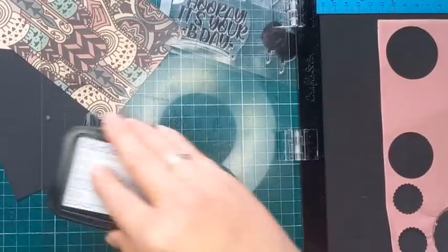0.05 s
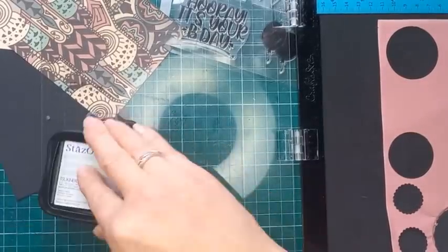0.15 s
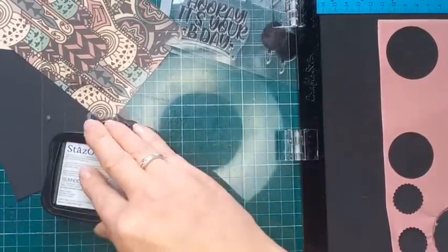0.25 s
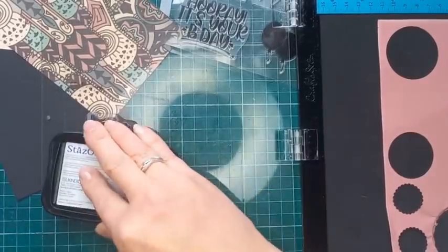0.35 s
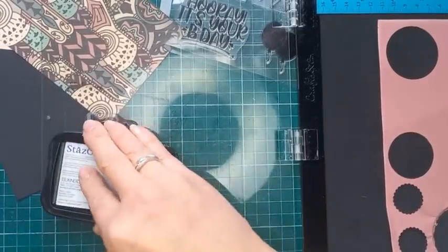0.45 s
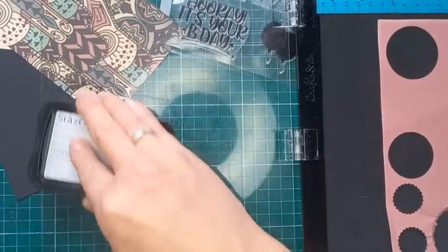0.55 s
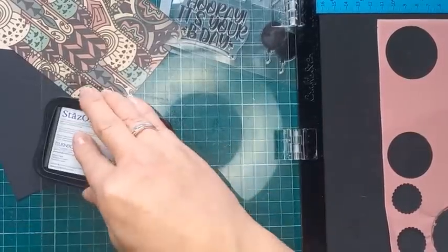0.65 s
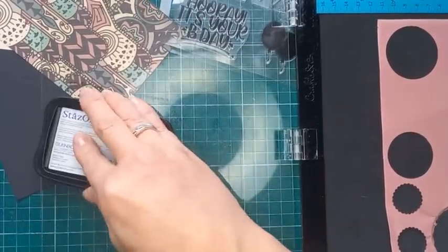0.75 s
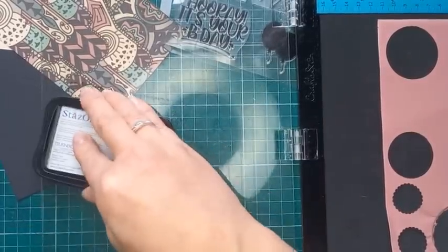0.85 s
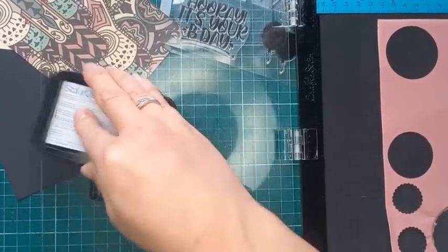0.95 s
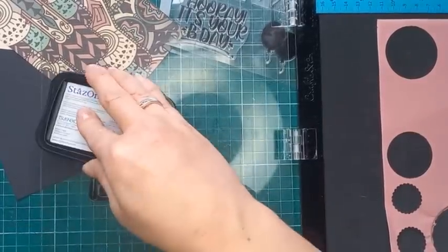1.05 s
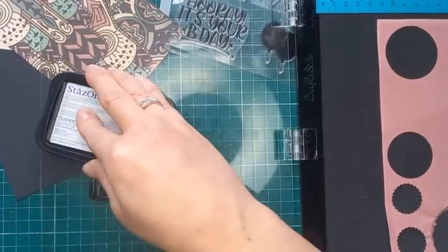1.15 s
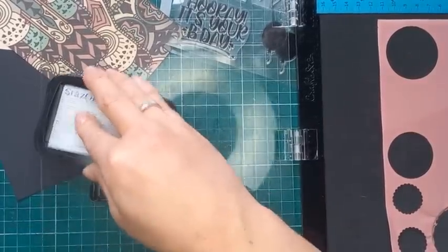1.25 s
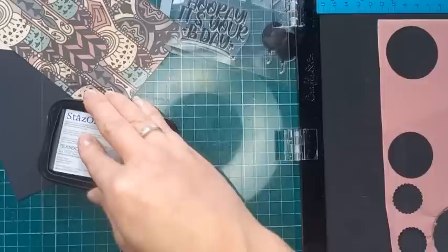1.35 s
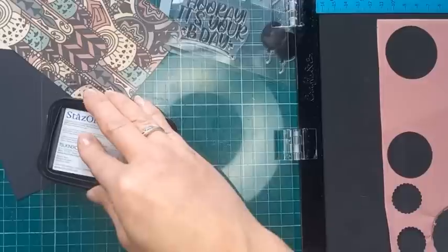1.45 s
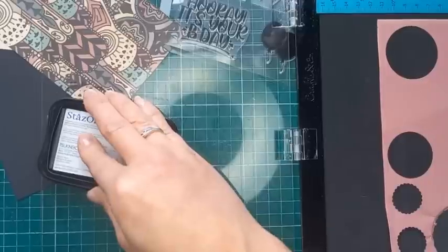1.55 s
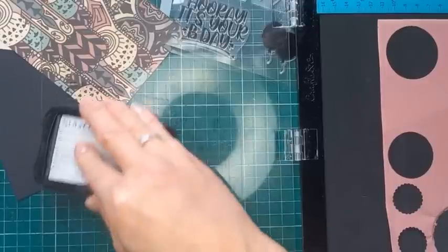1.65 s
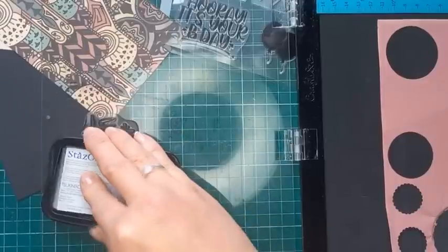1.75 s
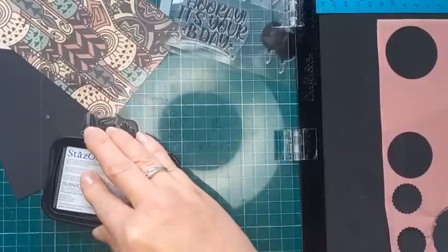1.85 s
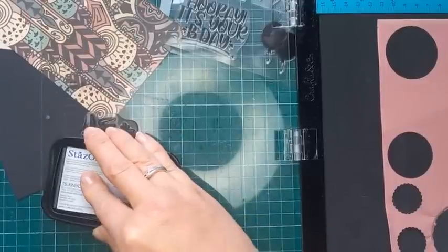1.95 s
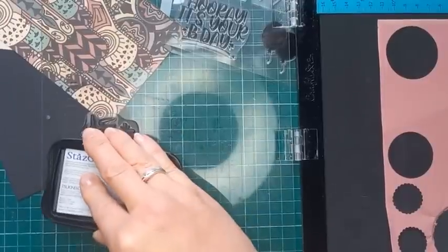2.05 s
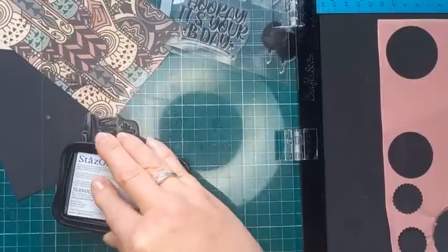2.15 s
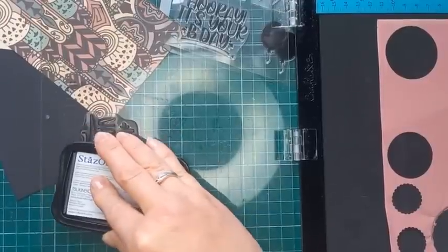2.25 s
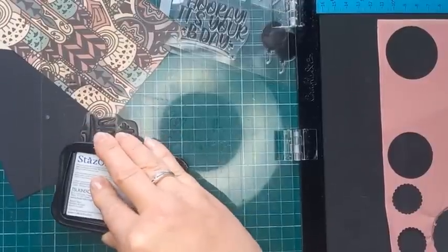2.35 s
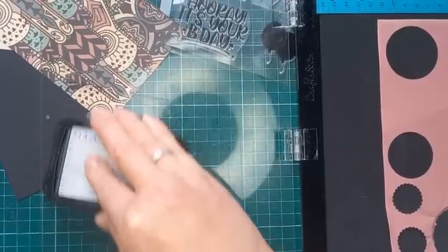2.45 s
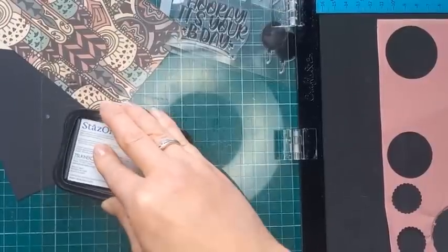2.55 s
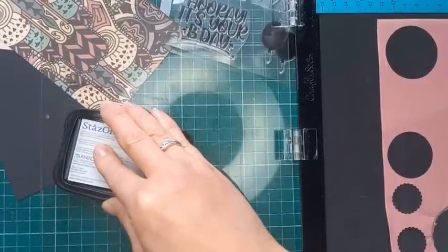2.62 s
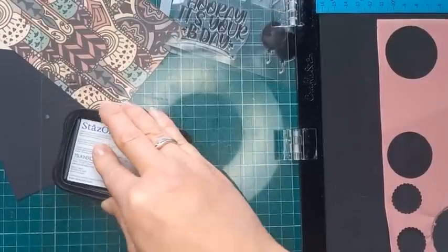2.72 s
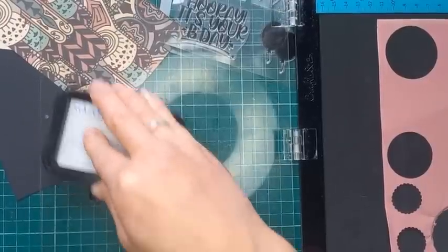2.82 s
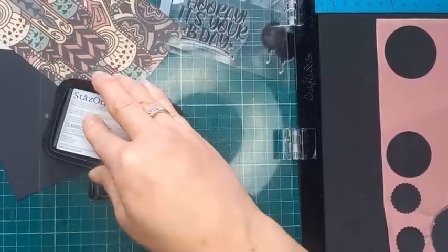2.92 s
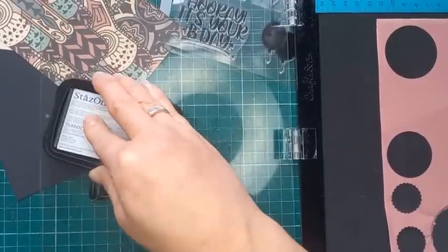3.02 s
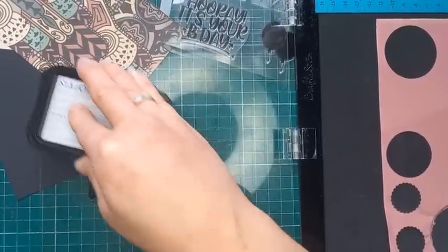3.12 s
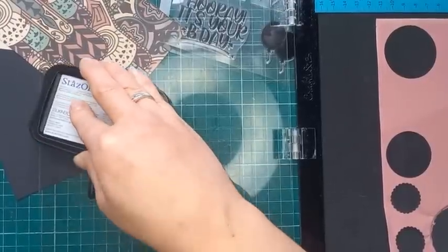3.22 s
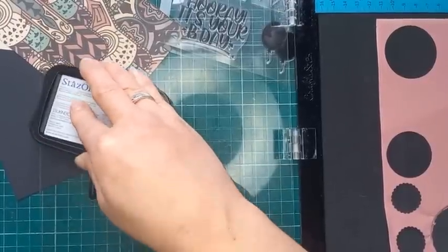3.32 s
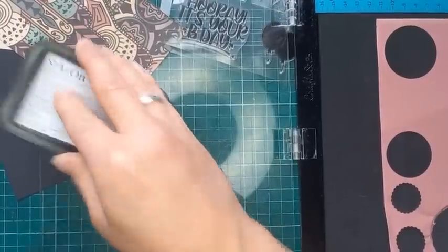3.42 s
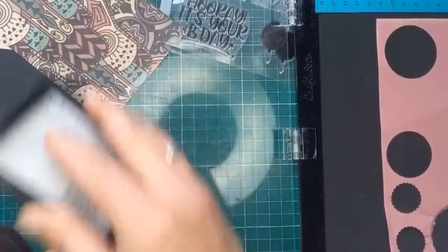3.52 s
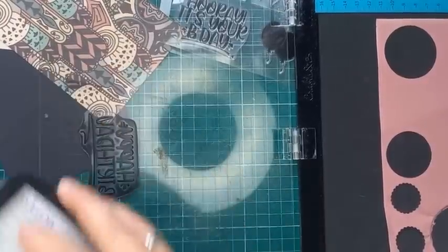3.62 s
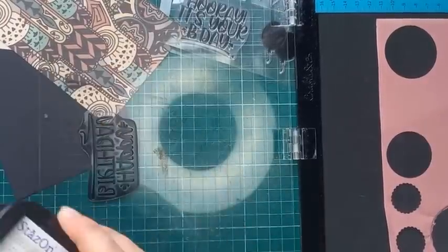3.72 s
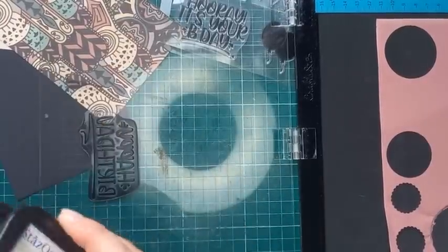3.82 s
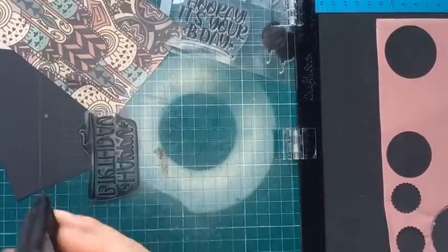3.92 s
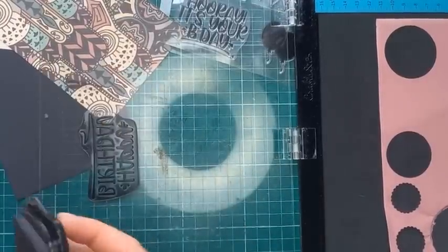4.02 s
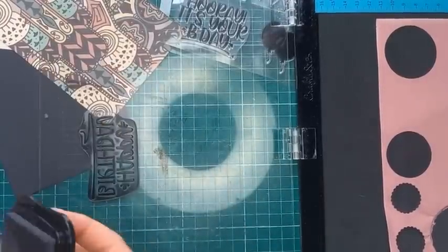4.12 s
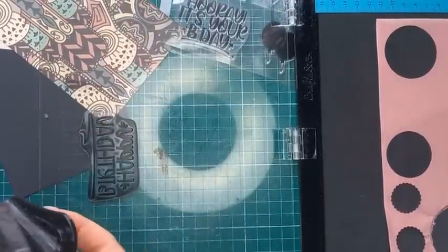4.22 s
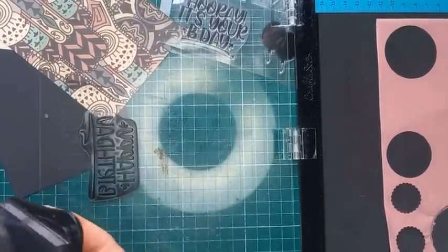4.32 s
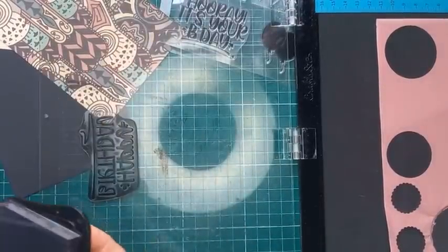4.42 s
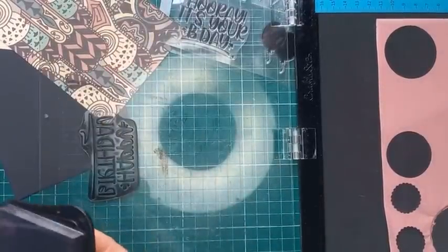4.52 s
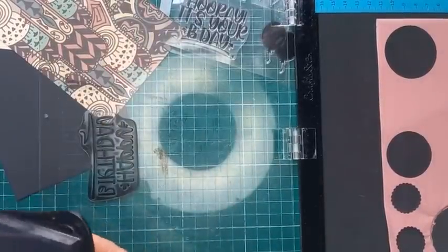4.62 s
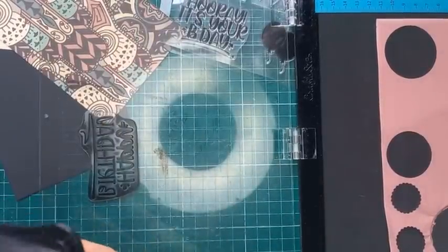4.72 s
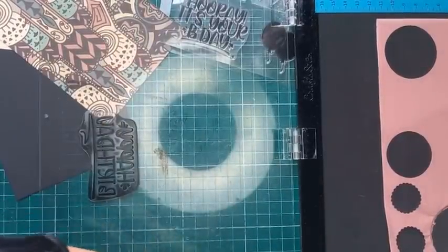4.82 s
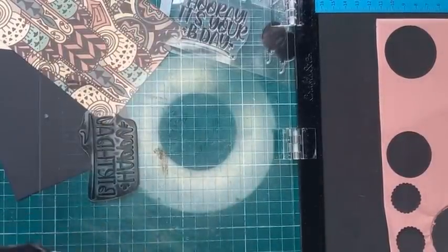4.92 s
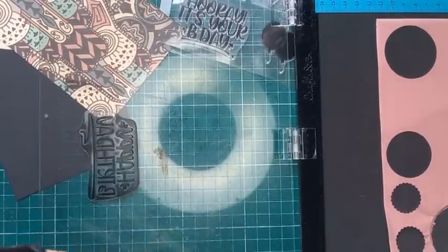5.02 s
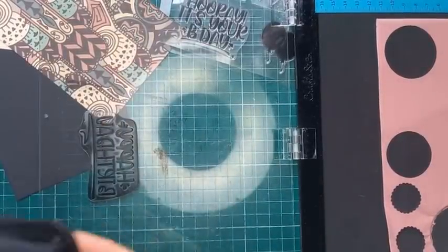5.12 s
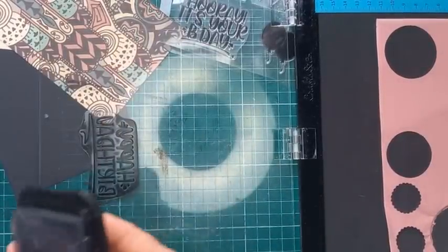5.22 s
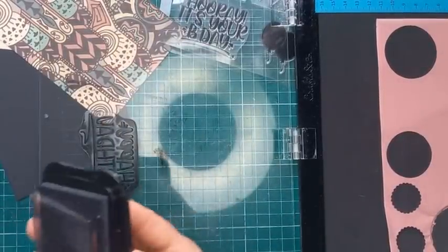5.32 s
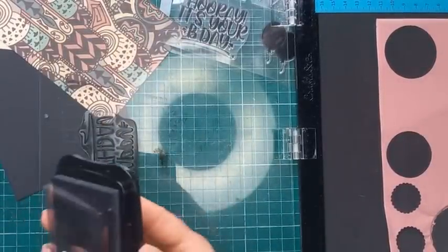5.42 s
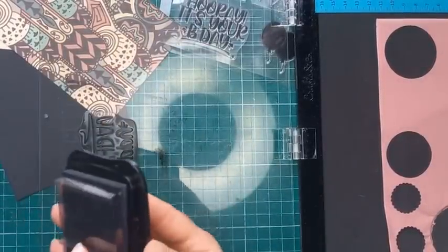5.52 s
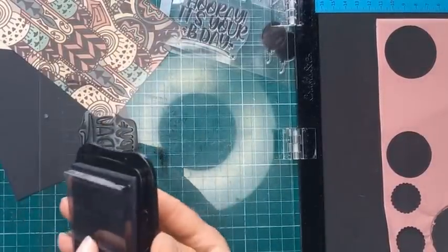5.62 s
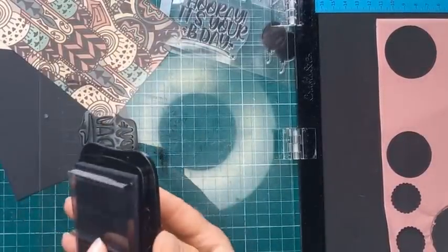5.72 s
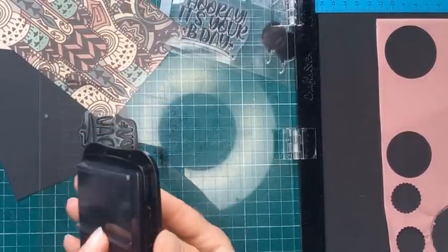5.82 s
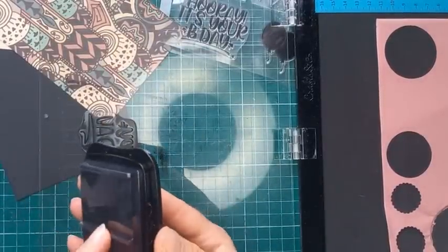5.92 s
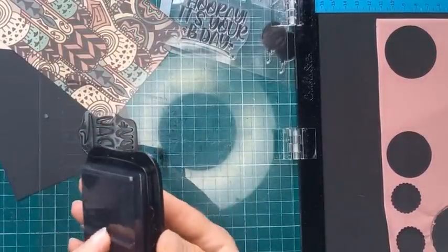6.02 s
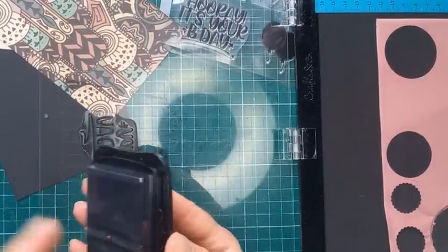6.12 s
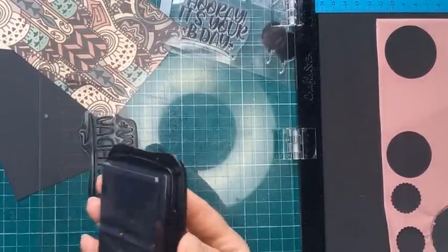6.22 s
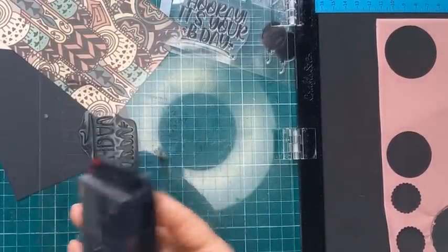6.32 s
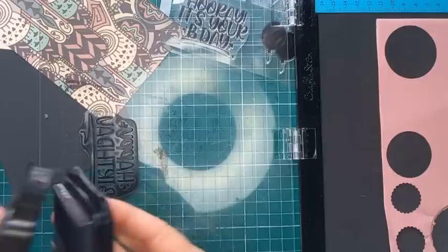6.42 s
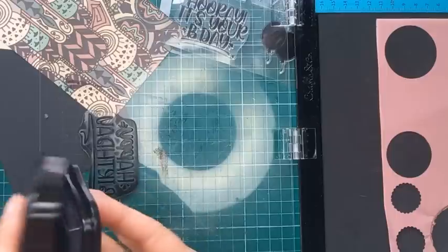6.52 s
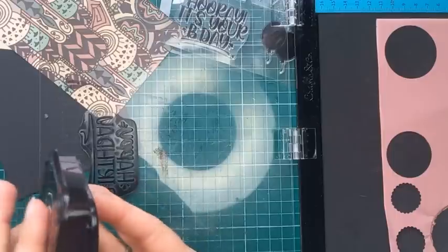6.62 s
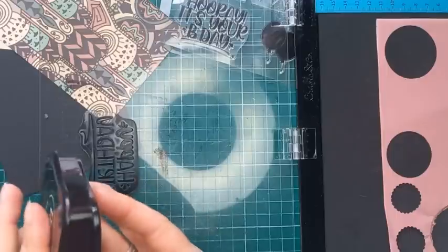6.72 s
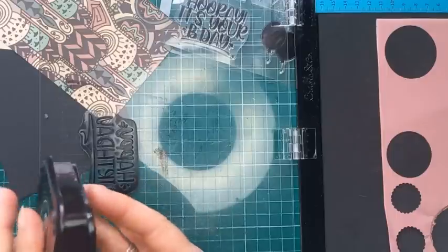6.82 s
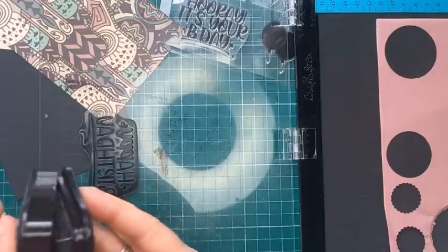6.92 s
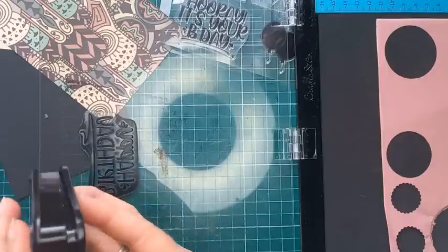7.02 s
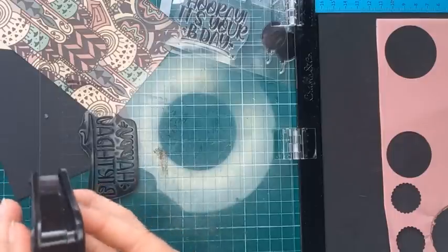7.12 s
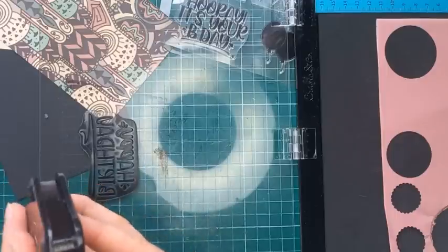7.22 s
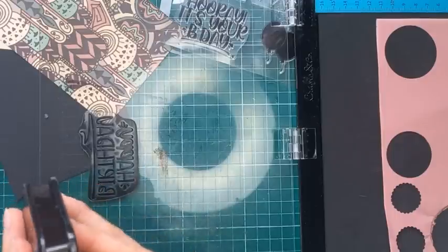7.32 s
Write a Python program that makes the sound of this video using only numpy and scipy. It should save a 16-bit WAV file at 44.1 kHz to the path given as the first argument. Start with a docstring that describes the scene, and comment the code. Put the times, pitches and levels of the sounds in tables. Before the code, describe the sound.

Close stereo pickup in a small room with short reflections and a faint low rumble and hiss. Fingers rub and tick on plastic at the very start. From 0.24 s to 3.2 s an ink pad is dabbed nine times on a rubber stamp, roughly every 0.4 s: first lightly, then more firmly, the sixth near 2.2 s with the hardest edge landing. Each dab is a tight, dry double clack with a soft low thump; between dabs the ink peels and pops quietly, the last pop at 3.4 s. A lull follows, with small lid clicks at 4.1-4.3 s, faint squeaks and soft hand shifts. Brushing and a click at 5.3 s lead to a sharp knock at 5.56 s. After near quiet, the lid clatters at 6.6-6.7 s, snaps in rapid clicks at 6.9-7.05 s, and the case bumps the table at 7.16 and, harder, at 7.25 s.

```python
"""Ink pad dabbed on a rubber stamp

A plastic ink pad is dabbed nine times on a rubber stamp on a craft table, close to the microphone in a small room.
In each dab the rim grazes the stamp, one edge lands, the pad rocks flat and the table thumps; the tacky ink then
peels and pops loose. Afterwards the lid is picked up, fitted and snapped on, and the case is bumped on the table.
Contacts are sums of decaying modes with noise cracks; rubbing and peeling are swelling stick-slip noise."""
import sys
import numpy as np
from scipy import signal
from scipy.fft import rfft, irfft
from scipy.io import wavfile

SR = 44100
rng = np.random.default_rng(int(sys.argv[2]) if len(sys.argv) > 2 else 0)


def file_out(sig):
    """Save sig as 16-bit WAV at sys.argv[1]."""
    # one column per channel
    cols = np.atleast_2d(sig).T
    # limit, then scale
    lim = np.clip(cols, -1, 1)
    pcm = np.round(lim * 32767).astype(np.int16)
    wavfile.write(sys.argv[1], SR, pcm)


N = 324576
TIME = np.arange(N) / SR
AGE = np.arange(SR // 8) / SR   # time since a contact, s

# Lid and case knocking together: start_s, level_db, lows_db, highs_db, wall_ring_hz, wall_ring_db
LID_CLICKS = [(4.1264, -41, -21, 9, 3460, 11), (4.2335, -31, 2.5, -2.5, 1510, -9),
              (4.315, -26, -8.5, -2, 2100, -4.5), (5.3111, -26.5, -9, 9.5, 1000, -6.5),
              (5.5575, -12.5, -11, -4.5, 4714, -5), (6.5947, -16, -28, 4, 1660, 1.5),
              (6.6473, -21, -31, 6, 1880, 2), (6.6845, -12, -39, -3.5, 1615, 1.5),
              (6.8974, -23, -6, -21, 1897, 0.5), (6.9131, -23.5, -7, -1.5, 1685, 9),
              (6.921, -28, -1, 13.5, 3660, -12), (6.9358, -21.5, -11.5, -4, 1740, -2),
              (7.008, -30, -14, 4, 3250, 9), (7.0339, -14.5, -13, -36, 1600, -13),
              (7.0442, -12, 0, -9, 1524, 5.5), (7.157, -12.5, -0.5, -8.5, 2170, -5),
              (7.2525, -17.5, 4.5, 6.5, 1760, 0)]
# Pad landing on the stamp: start_s, edge_landing_db, rock_flat_s, face_landing_db, table_push_db,
# edge_sharpness_db, left_minus_right_db, face_ring_hz
PAD_DABS = [(0.2395, -30.5, .0066, -20.5, -31.5, -9.5, -1, 3040),
            (0.6533, -22.5, 0.011, -20.5, -22, -9, 0.5, 1660),
            (1.0272, -14, .007, -16.5, -18.5, -6, 2.5, 1586),
            (1.4018, -21, .0088, -16, -20.5, -4.5, 0.5, 1700),
            (1.807, -14.5, 0.0035, -17, -18.5, -4.5, -0.5, 3190),
            (2.1905, -4, 0.0049, -19, -28, -16.5, 0, 1890),
            (2.551, -17.5, .0047, -10.5, -24, -13.5, -2, 1830),
            (2.9182, -14.5, 0.0033, -12, -16.5, -17.5, -0.5, 3020),
            (3.2103, -15.5, .0048, -10, -17, -19.5, 0.5, 2260)]
# Pad lifting off: pop_s, pop_db, hardest_pull_to_pop_s, peeling_db, table_rebound_db
PAD_LIFTS = [(0.4957, -38.5, -0.032, -53, -43.5), (0.9491, -26, 0.014, -51, -62),
             (1.3164, -19, 0.0042, -42, -48), (1.722, -27, 0.034, -53, -53),
             (2.1146, -30, 0.026, -58.5, -57), (2.4581, -27, 0.017, -51, -54),
             (2.8413, -24.5, .012, -54, -36.5), (3.1701, -40, 0.036, -55.5, -37),
             (3.4355, -21.5, 0.0042, -53.5, -46)]
# Modes of the pad: pitch_hz, level_db, t60_s
PAD_MODES = [(292, 5.5, 0.011), (703, -6.5, 0.028), (884, 10.5, 0.021), (1230, -19.5, .02),
             (1654.5, -6, 0.013), (2060, -4.5, .02), (2364, 3.5, 0.023), (3084, -6, 0.024),
             (3730, -1, 0.03), (5100, -4, 0.013)]
# Modes of the lid: pitch_hz, level_db, t60_s
LID_MODES = [(322, -27.5, 0.039), (698.5, 7, 0.026), (727, 7.5, 0.037), (985, 4, .03), (1472, 3.5, 0.013),
             (1926, 4, 0.029), (2230, -2, 0.02), (3200, -4, 0.014), (3465, 4, 0.017), (4470, -5, 0.011),
             (5900, -12.5, 0.052)]


def from_db(db):
    """Amplitude gain from decibels: 20 dB is a factor of ten."""
    return 10 ** (np.asarray(db) / 20)


def rms_one(x):
    """Normalise the mean power to one, so that gains alone set levels."""
    return x / np.sqrt(np.mean(x ** 2) + 1e-20)


def unit_hit(x):
    """Normalise a transient by energy: that of 4 ms at unit rms."""
    return rms_one(x) * np.sqrt(.004 * SR / x.shape[-1])


def fade(t, t60):
    """Exponential decay of a damped resonance, 60 dB in t60 seconds."""
    return np.exp(-np.log(1000) * t / t60)


def swell(s, half):
    """A Gaussian rise and fall of effort around time s, down to 1/e at s +/- half."""
    return np.exp(-((TIME - s) / half) ** 2)


def at_hz(points, hz):
    """Interpolate a table linearly along a logarithmic frequency axis."""
    f, value = np.transpose(points)
    return np.interp(np.log(np.maximum(hz, 1)), np.log(f), value)


def cut(x, hz, kind, order=2):
    """Butterworth filtering: a maximally flat passband."""
    sos = signal.butter(order, np.clip(hz, 10, .45 * SR), kind, fs=SR, output="sos")
    return signal.sosfilt(sos, x)


def colour(x, spectrum, size=4096):
    """Minimum-phase filtering: folding the cepstrum gives a causal response with the given spectrum."""
    hz = np.arange(size // 2 + 1) * SR / size
    cepstrum = irfft(np.log(from_db(at_hz(spectrum, hz))))
    cepstrum[1:size // 2] *= 2
    cepstrum[size // 2 + 1:] = 0
    response = irfft(np.exp(rfft(cepstrum)))
    return signal.fftconvolve(x, response[None], axes=-1)[:, :x.shape[-1]]


def stereo_noise(size, apart):
    """Partly coherent white noise at two ports; apart is the side-to-mid ratio."""
    mid, side = rng.standard_normal((2, size))
    return rms_one(mid + apart * side * [[1], [-1]])


def add(track, s, sound):
    """Linear superposition of a sound from time s."""
    start = round(s * SR)
    track[:, start:start + sound.shape[-1]] += sound[..., :N - start]


def background(wander_db):
    """Stationary hiss over a rumble of slowly modulated power; both swell from a quieter start."""
    # Noise spectrum: frequency_hz, density_db (per Hz)
    floor_spectrum = [(25, -33), (45, -7.5), (62, 3.5), (130, -8), (250, -9.5), (500, -18.5), (1200, -28),
                      (3000, -31), (4000, -34), (5200, -32), (7000, -34.5), (16000, -33.5)]
    rumble_db, hiss_db = -65, -62
    start_dip_db, start_swell_s = -9.5, 1.2
    low_noise = cut(stereo_noise(N, 3), 700, "high", order=1)   # thinned lows, wide between the ports
    noise = rms_one(colour(stereo_noise(N, 0.86) + low_noise, floor_spectrum))
    steps = np.arange(0, N / SR + 1, 1 / 10)
    wander = np.interp(TIME, steps, 2 * rng.random(len(steps)) - 1)
    rumble = from_db(rumble_db + wander_db * wander) * cut(noise, 440, "low", order=1)
    hiss = from_db(hiss_db) * cut(noise, 550, "high", order=1)
    return from_db(start_dip_db * np.exp(-(TIME / start_swell_s) ** 2)) * (rumble + hiss)


def room_response(build_s):
    """Diffuse reverberation: close reflections decay band by band; long waves are alike at both ports."""
    # Decay of the room: frequency_hz, t60_s
    decay_times = [(60, 0.6), (200, 0.27), (500, 0.17), (1100, 0.15), (3000, 0.2), (7000, .185),
                   (16000, 0.13)]
    # Reverberant spectrum: frequency_hz, density_db (per Hz)
    tail_spectrum = [(60, -6.5), (200, 0), (500, 5), (1000, -4), (2000, -2.5), (5000, -1.5), (9000, -4.5),
                     (16000, 1)]
    t, tail = TIME[:SR // 2], 0
    edges = 40 * 2 ** np.arange(10)   # octave bands, Hz
    for low, high in zip(edges, edges[1:]):
        hz = np.sqrt(low * high)
        noise = cut(stereo_noise(len(t), (hz + 200) / (hz + 700)), [low, high], "band")
        band = noise * fade(t, at_hz(decay_times, hz)) * (1 - np.exp(-(t / build_s) ** 2))
        band_gain = np.sqrt(2 * (high - low) / SR / len(t)) * from_db(at_hz(tail_spectrum, hz))
        tail = tail + rms_one(band) * band_gain
    return tail


def room(x, wet_db, build_s, count=4):
    """Position-dependent reflections: as the hands move, equal-power crossfades pass between responses."""
    place, out = 2 * TIME % count, 0   # two places a second, in a cycle
    for k in range(count):
        distance = np.abs((place - k + count / 2) % count - count / 2)
        nearness = np.sqrt(np.maximum(1 - distance, 0))
        out = out + signal.fftconvolve(x * nearness, room_response(build_s), axes=-1)[:, :N]
    return from_db(wet_db) * out


def hand_shifts():
    """Low-frequency friction noise: soft rumbles as the hands lean and shift on the table."""
    # Movements: middle_s, half_length_s, level_db
    movements = [(4.62, 0.18, -68), (5.604, .07, -62), (5.9, 0.093, -62.5), (6.186, 0.015, -72.5),
                 (6.48, 0.13, -53.5)]
    effort = sum(from_db(db) * swell(s, half) for s, half, db in movements)
    return effort * rms_one(cut(stereo_noise(N, 0.58), [54.4, 233.3], "band"))


def squeaks():
    """Stick-slip oscillation: narrow-band noise gives a fingertip's squeak its wavering pitch."""
    # Faint squeaks on the case: middle_s, half_length_s, pitch_hz, level_db
    slips = [(3.735, .05, 2600, -72.5), (4.70, .018, 4600, -61.5), (5.09, 0.029, 3040, -68),
             (6.405, 0.096, 2640, -64.5)]
    band, out = np.array([-60, 60]), 0   # band edges about the pitch, Hz
    for s, half, hz, db in slips:
        tone = rms_one(cut(stereo_noise(N, 0.97), hz + band, "band", order=1))
        out = out + from_db(db) * swell(s, half) * tone
    return out


def peels():
    """Adhesive peeling: the ink sounds in a swell around the hardest pull of each lift."""
    half_s = 0.026
    return [(s - lead, half_s, db) for s, _, lead, db, _ in PAD_LIFTS]


def catches():
    """Friction before slip: the rims scrape briefly just before each click."""
    lead_s, half_s, relative_db = 0.0044, 0.007, -22   # relative to the click's level
    return [(s - lead_s, half_s, db + relative_db) for s, db, *_ in LID_CLICKS]


def rubbing(gain_db, grains_per_s, grain_db, smooth_db, ring_db):
    """Stick-slip friction: tiny grains over a smooth hiss swell with each movement and ring the plastic."""
    # Fingers sliding on the plastic: middle_s, half_length_s, level_db
    strokes = [(0, 0.031, -37.5), (.14, 0.1, -47.5), (3.42, 0.15, -52.5), (4.233, 0.024, -45),
               (4.699, 0.016, -53), (5.216, 0.037, -48.5), (5.333, 0.044, -44.5), (5.501, 0.017, -36.5),
               (5.83, 0.015, -50.5), (6.437, 0.2, -61), (6.95, 0.024, -53), (7.216, 0.024, -55)]
    # Modes of the case under a sliding finger: pitch_hz, level_db, t60_s
    slide_modes = [(1740, 0.5, 0.032), (2071, -2, 0.13), (2450, 0.5, 0.049), (3070, -6, 0.2),
                   (3594, 0, 0.017), (5300, -3, 0.045)]
    # Friction spectrum: frequency_hz, density_db (per Hz)
    rub_spectrum = [(100, -32), (700, -20.5), (1200, -6.5), (1800, -6.5), (3000, 0.5), (5500, -3),
                    (7500, -6), (16000, -16.5)]
    effort = sum(from_db(db) * swell(s, half) for s, half, db in list(strokes) + peels() + catches())
    grain_sizes = from_db(grain_db * np.minimum(rng.exponential(1, N), 4))
    grains = (rng.random(N) < grains_per_s / SR) * grain_sizes
    friction = rms_one(grains * stereo_noise(N, 0.36)) + from_db(smooth_db) * stereo_noise(N, 0.49)
    shell = sum(from_db(db) * np.cos(2 * np.pi * hz * AGE) * fade(AGE, t60) for hz, db, t60 in slide_modes)
    ringing = rms_one(signal.fftconvolve(friction, shell[None], axes=-1)[:, :N])
    return from_db(gain_db) * effort * rms_one(colour(friction + from_db(ring_db) * ringing, rub_spectrum))


def struck(modes, crack_db, crack_t60, apart, rise_s):
    """Modal synthesis: each mode has its own strength at each port, over a crack of dense upper modes."""
    hz, db, t60 = np.transpose(modes)[:, :, None]
    strength = from_db(db + 2 * rng.standard_normal((2, len(modes), 1)))
    # Short waves reach the ports out of step.
    skew = apart * np.sqrt(hz / hz.max()) * rng.standard_normal((2, len(modes), 1))
    side = rng.choice([-1, 1], (len(modes), 1))   # the point struck sets each mode's direction
    rings = (side * strength * np.sin(2 * np.pi * hz * AGE + skew) * fade(AGE, t60)).sum(axis=1)
    crack = cut(stereo_noise(len(AGE), 0.96) * fade(AGE, crack_t60), 8200, "low", order=1)
    return (unit_hit(rings) + from_db(crack_db) * unit_hit(crack)) * (1 - np.exp(-AGE / rise_s))


def small_hits(events, body_of, thin_hz):
    """Impulse excitation differing only in strength, with a high-pass that thins the body's lower modes."""
    out = np.zeros((2, N))
    for s, db in events:
        add(out, s, from_db(db) * unit_hit(cut(body_of(), thin_hz, "high", order=3)))
    return out


def knocks(events, body_of, wall_cycles, low_db, mid_db, high_db, top_db):
    """Hard contact: the grip picks one wall resonance, weight sets the lows and sharpness the highs."""
    out, phase = np.zeros((2, N)), np.array([[.5], [-.5]])
    for s, db, lows, highs, pan, wall_hz, wall_db in events:
        body = body_of()
        wall = unit_hit(np.sin(2 * np.pi * wall_hz * AGE + phase) * fade(AGE, wall_cycles / wall_hz))
        low = from_db(lows + low_db) * unit_hit(cut(body, [260, 1050], "band", order=3))
        body_mid = unit_hit(cut(body, [1100, 3500], "band"))
        mid = from_db(mid_db) * unit_hit(body_mid + from_db(wall_db) * wall)
        high = from_db(highs + high_db) * unit_hit(cut(body, 4200, "high", order=4))
        top = from_db(highs + top_db) * unit_hit(cut(body, 9500, "high", order=4))
        port_gain = from_db(db + np.array([[pan], [-pan]]) / 2)
        add(out, s, port_gain * (low + mid + high + top))
    return out


def case_ticks():
    """Light impacts: fingers and nails tick on the case, which also ticks at each hardest pull."""
    # Finger and nail contacts: start_s, level_db (before the common gain below)
    finger_taps = [(0.0548, -24), (0.0897, -26), (0.1296, -29.5), (0.2146, -28), (3.486, -24),
                   (3.5006, -29), (3.5774, -37), (4.2097, -34), (5.3854, -30), (6.3217, -41), (6.5444, -38)]
    grip_ticks = [(s, db + 14) for s, _, db in peels()]   # 14 dB above the peeling's entry
    body_of = lambda: struck(LID_MODES, crack_db=10.0, crack_t60=0.026, apart=3.2, rise_s=0.00016)
    return from_db(-6.5) * small_hits(list(finger_taps) + grip_ticks, body_of, thin_hz=1579)


def case_bumps():
    """Edge impact: the case strikes the table and rings its own few modes."""
    # Edge-on bumps: start_s, level_db
    bump_events = [(5.56, -34.5), (6.685, -40.5), (7.046, -55), (7.157, -24.5), (7.251, -12)]
    # Modes of the case on the table: pitch_hz, level_db, t60_s
    case_modes = [(248, 15, 0.014), (360, 1, 0.018), (390, -29.5, 0.091), (487, -1, 0.047), (747, 0, 0.054)]
    body_of = lambda: struck(case_modes, crack_db=-3.5, crack_t60=0.051, apart=0.93, rise_s=0.00037)
    return small_hits(bump_events, body_of, thin_hz=168)


def lid_clicks():
    """Impact of thin shells: lid and case knock together and ring the lid's modes with one wall mode."""
    pan_db = 0.5   # left minus right
    contacts = [(s, db, lows, highs, pan_db, hz, ring_db) for s, db, lows, highs, hz, ring_db in LID_CLICKS]
    body_of = lambda: struck(LID_MODES, crack_db=4.5, crack_t60=0.025, apart=0.83, rise_s=0.00018)
    return knocks(contacts, body_of, wall_cycles=35, low_db=-5, mid_db=-2, high_db=-5, top_db=-12.5)


def ink_pops():
    """Sudden release of tension: the ink lets go with a pop, and the last corner follows more softly."""
    # Modes of the lifted pad: pitch_hz, level_db, t60_s
    lifted_modes = [(965, -29, .06), (1420, -6.5, 0.046), (1887.6, -7, .02), (2240, 4.5, .014),
                    (2580, 18.5, 0.0028), (3485, -20.5, .01)]
    afterpop_s, afterpop_db = 0.015, -17   # delay and level relative to the first pop
    pops = [(s, db) for s, db, *_ in PAD_LIFTS]
    afterpops = [(s + afterpop_s, db + afterpop_db) for s, db in pops]
    body_of = lambda: struck(lifted_modes, crack_db=-9.5, crack_t60=0.02, apart=0.7, rise_s=0.00038)
    return small_hits(pops + afterpops, body_of, thin_hz=755)


def table_pushes():
    """Action and reaction: each dab presses the table down; each lift lets it spring back."""
    push_lag_s, push_s, rebound_s = .0015, .003, 0.007   # the hand's weight reaches the table after a lag
    presses = [(s + push_lag_s, db, push_s) for s, _, _, _, db, *_ in PAD_DABS]
    rebounds = [(s - lead, db, rebound_s) for s, _, lead, _, db in PAD_LIFTS]
    return presses + rebounds


def table_thumps(gain_db):
    """Forced vibration: a soft push sways the top; neighbouring modes start opposed, so the thump swells."""
    # Modes of the table top: pitch_hz, level_db, t60_s
    table_modes = [(62.6, -7, 0.22), (86.7, -4, 0.19), (130.7, 0, 0.13), (179, -13.5, 0.21),
                   (228.9, -0.5, 0.11), (286.2, -2.5, 0.12), (342.5, -7.5, 0.19)]
    out, t, sway = np.zeros((2, N)), TIME[:SR // 2], 0
    for k, (hz, db, t60) in enumerate(table_modes):
        sway = sway + (-1) ** k * from_db(db) * np.sin(2 * np.pi * hz * t) * fade(t, t60)
    for s, db, length in table_pushes():
        push = np.sin(np.pi * np.minimum(AGE / length, 1))   # half a sine of force
        add(out, s, from_db(db + gain_db) * signal.fftconvolve(sway, push / push.sum()))
    return out


def rim_grazes():
    """Glancing contact: the rim brushes the stamp first; a slanted pad grazes more and lands more sharply."""
    lead_s, base_db = .0045, -29
    graze_per_sharpness = 1.6   # dB per dB
    contacts = [(s - lead_s, base_db + graze_per_sharpness * sharp_db)
                for s, _, _, _, _, sharp_db, *_ in PAD_DABS]
    body_of = lambda: struck(PAD_MODES, crack_db=-21.5, crack_t60=0.013, apart=0.64, rise_s=0.0002)
    return small_hits(contacts, body_of, thin_hz=295)


def dab_contacts():
    """Successive impacts of a rocking body: edge, then face, then a last light touch."""
    edge_lows_db, edge_wall_hz, edge_wall_db = -11.5, 1520, -8.5
    ring_per_dullness = 0.75   # dB more wall ring for each dB by which the edge lands duller
    face_lows_db, face_highs_db, face_wall_db = -9, -6, -8
    settle_rocks, settle_db = 2.4, -12.5   # rocking times after the edge; level relative to the face
    for s, edge_db, rock_s, face_db, _, sharp_db, pan, face_hz in PAD_DABS:
        edge_ring_db = edge_wall_db - ring_per_dullness * sharp_db
        settle_s = s + settle_rocks * rock_s
        yield s, edge_db, edge_lows_db, sharp_db, pan, edge_wall_hz, edge_ring_db
        yield s + rock_s, face_db, face_lows_db, face_highs_db, pan, face_hz, face_wall_db
        yield settle_s, face_db + settle_db, face_lows_db, face_highs_db, -pan, face_hz, face_wall_db


def pad_taps():
    """Impact excitation: each landing of the pad rings its modes and one resonance of its wall."""
    body_of = lambda: struck(PAD_MODES, crack_db=9.5, crack_t60=0.026, apart=0.8, rise_s=0.0018)
    return knocks(dab_contacts(), body_of, wall_cycles=55, low_db=-0.5, mid_db=-7.0, high_db=0, top_db=-6.5)


def scene():
    """Superposition of direct and reflected sound, filtered by the microphone's response."""
    # Microphone response with a treble dip: frequency_hz, gain_db
    microphone_response = [(30, -20), (60, 2.5), (5000, 2), (7300, -3), (8300, -19.5), (10000, -18.5),
                           (13500, -18.5), (14800, 1), (16000, -14.5)]
    rubs = rubbing(gain_db=-3.5, grains_per_s=2200, grain_db=7, smooth_db=-1.5, ring_db=-7.5)
    plastic = squeaks() + rubs + case_ticks() + case_bumps() + lid_clicks() + rim_grazes() + pad_taps()
    pops = ink_pops()
    thumps = table_thumps(gain_db=1.0)
    direct = plastic + from_db(-9.5) * pops + thumps
    into_room = plastic + from_db(-10) * pops + from_db(-3.5) * thumps
    heard = direct + room(into_room, wet_db=-6.5, build_s=0.01)
    return colour(heard + hand_shifts() + background(wander_db=7), microphone_response)


def record(dry):
    """Saturation and band limiting: the highest peaks are rounded and the top is cut."""
    cutoff_hz = 16200
    rounded = dry / (1 + dry ** 6) ** (1 / 6)
    return signal.sosfilt(signal.ellip(10, .2, 80, cutoff_hz, fs=SR, output="sos"), rounded)


dry = scene()
out = record(dry)
file_out(out)
```